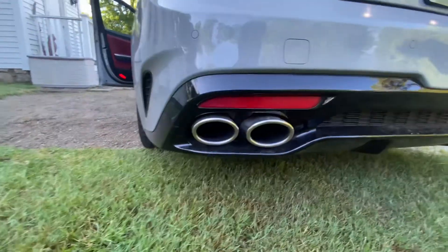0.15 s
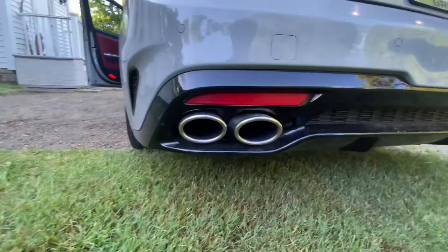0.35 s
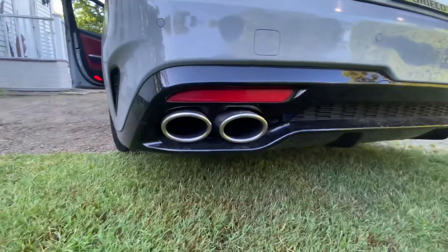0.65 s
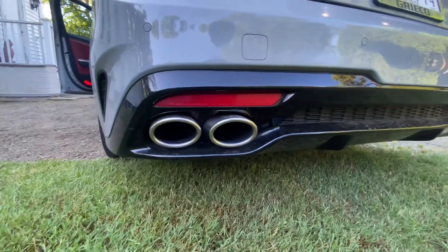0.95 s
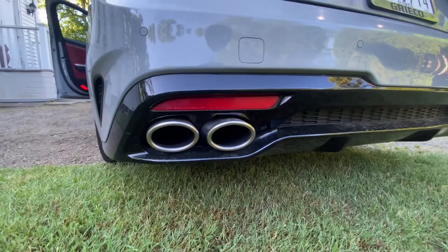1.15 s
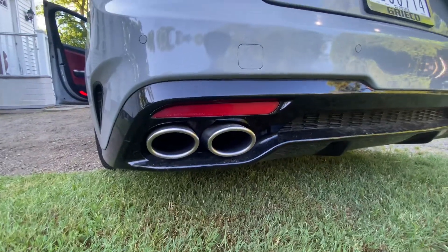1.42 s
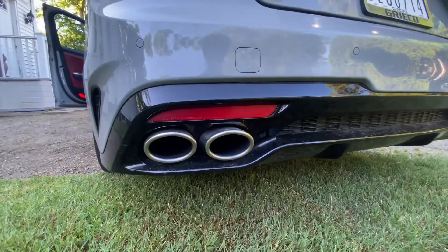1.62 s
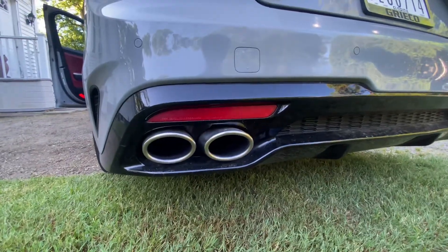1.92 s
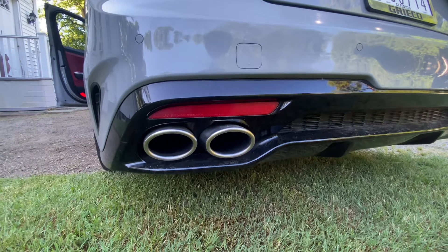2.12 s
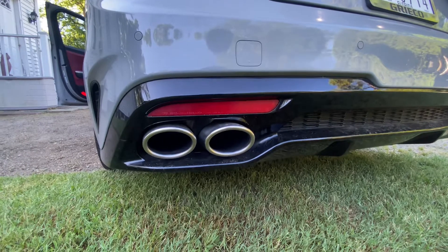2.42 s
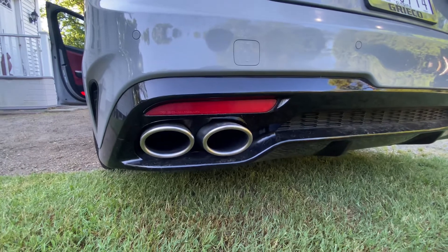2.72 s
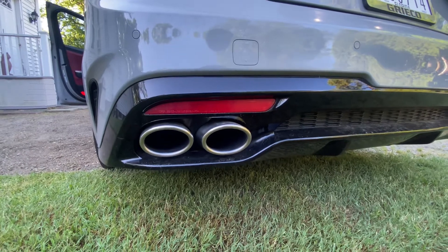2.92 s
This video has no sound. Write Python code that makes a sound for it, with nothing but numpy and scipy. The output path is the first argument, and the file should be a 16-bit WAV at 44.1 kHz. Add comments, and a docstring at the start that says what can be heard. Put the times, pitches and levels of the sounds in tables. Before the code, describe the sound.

Deep burbling exhaust idle heard close behind a parked car, with distant birdsong and tiny ticks

```python
"""A six-cylinder car idles, heard close behind its twin tailpipes, for about three seconds.
Throughout, harmonics make a deep hum, uneven puffs ring the pipe, and shaped noise makes gas rush and hiss.
The hiss eases in the first half second, while gliding tones make other birds' thin chirps.
One firing pushes harder after a second; a faint noise tick follows, then a far bird repeats three gliding notes.
Two more ticks, more chirps and another hard firing come in among its phrases."""
import sys
import numpy as np
from scipy import signal
from scipy.fft import rfft, irfft, next_fast_len
from scipy.io import wavfile
from scipy.ndimage import map_coordinates

SR = 44100
rng = np.random.default_rng(int(sys.argv[2]) if len(sys.argv) > 2 else 0)


def bounce(signal):
    """Save signal as a 16-bit WAV file at the path given by the first command-line argument."""
    frames = np.transpose(np.atleast_2d(signal))
    limited = np.clip(frames, -1, 1)
    pcm = np.round(limited * 32767).astype(np.int16)
    wavfile.write(sys.argv[1], SR, pcm)


N = 134946

# In every table and setting, a positive left-right value means the left is louder.
# engine speed: (time [s], firing rate [Hz])
ENGINE_SPEED = [(0.0, 68.88), (0.2, 69.48), (0.4, 70.42), (0.53, 69.67), (0.87, 70.25), (1.08, 69.03),
                (1.16, 68.42), (1.25, 68.91), (1.37, 69.66), (1.47, 68.56), (1.57, 69.95), (1.68, 68.27),
                (1.8, 69.34), (2.2, 69.69), (2.6, 69.12), (2.93, 68.94), (3.06, 68.99)]
CYLINDER_COUNT = 6
FIRST_FIRING = 0.027  # place in the cycle at the start [firings]

# harmonics of the hum: (multiple of one bank's firing rate, relative level [dB])
HUM_HARMONICS = [(1, -31), (2, 0), (3, -15), (4, -6.6), (5, -18), (6, -26), (7, -25.5), (8, -25.5),
                 (9, -25.5), (10, -24.5), (15, -38), (18, -39), (20, -39), (22, -39), (24, -42)]
# left-right balance of the hum: (frequency [Hz], left-right [dB])
HUM_BALANCE = [(69, .5), (104, .7), (139, -2.1), (174, -5), (208, 6.6), (347, 5.8), (560, 8.5)]
HUM_DB, HUM_LAG_S = -13, 0.00024
BANK_LEAD = 0.1  # lead of the odd harmonics [firings]
DISPERSION_S_PER_HZ = .000003  # the silencer delays high harmonics
SILENCER_HZ, SILENCER_WIDTH_HZ = 260, 14
WAVER_SHARE = .035  # dB of waver for each dB of a harmonic's relative level

# harder firings: (time [s], peak level [dB])
HARD_FIRINGS = [(1.143, -22), (2.791, -20)]
THUMP_S = 0.0019  # time from the peak to 1/e of it

# cylinders: (place in the cycle [firings], relative puff level [dB], relative ring level [dB])
CYLINDER_FIRINGS = [(.36, 0, -9), (1.15, 1, -5), (2.33, 0, -10), (3.05, -.5, -3.5), (4.33, -2, -8),
                    (5.15, -2.5, 2)]
# tone colour of a puff: (frequency [Hz], relative level [dB])
PUFF_COLOUR = [(250, -41), (390, -15), (438, 2), (468, -3.5), (505, 9.5), (535, 4), (570, 8), (640, 5.5),
               (690, 2.5), (730, -9), (790, -15), (850, -6), (950, -12), (1100, -11.5), (1350, -27),
               (1600, -34), (2100, -41), (3000, -57.5), (6000, -79)]
PUFF_DB, PUFF_PAN_DB, PUFF_LAG_S = -36, 8, 0.0005
PUFF_SCATTER_DB, PUFF_JITTER_S = 1.2, .00007
# pipe resonances: (frequency [Hz], width of one filter pass [Hz], relative level [dB])
PIPE_RESONANCES = [(905, 20, -1), (914, 62, 2.5), (1255, 50, -11)]
# loudness of the pipe ring: (time [s], level [dB])
RING_LOUDNESS = [(0, -40), (.4, -37.5), (.95, -38), (1.5, -39.5), (3.06, -39.5)]
RING_PAN_DB, RING_LAG_S = 5.5, .00003
RING_SCATTER_DB, RING_JITTER_S = 1.6, .00005

# colour of the low exhaust noise: (frequency [Hz], relative level per Hz [dB])
RUMBLE_COLOUR = [(20, -19), (55, -2), (90, -1), (150, -9), (200, -13), (320, -10.5), (450, -27),
                 (1000, -89.5)]
# colour of the gas rush: (frequency [Hz], relative level per Hz [dB])
GAS_COLOUR = [(120, -23.5), (220, -11.5), (320, -2.5), (400, -4), (600, 1), (780, -9.5), (945, -4),
              (1040, -4), (1270, -8), (1450, -17.5), (2200, -21), (4000, -53)]
# left-right balance of the gas rush: (frequency [Hz], left-right [dB])
GAS_BALANCE = [(200, 5), (400, -4), (550, 6.5), (780, 9), (950, 1.5), (1500, 2.5)]
RUMBLE_DB, GAS_DB, GAS_LAG_S = -32.5, -39.5, 0.00037

# colour of the engine hiss: (frequency [Hz], relative level per Hz [dB])
HISS_COLOUR = [(400, -7.5), (1500, -14.5), (2000, 1.5), (2500, -4), (3500, -7.5), (5000, -10.5),
               (7000, -14), (8600, -20), (10500, -21.5), (11900, -16.5), (12500, -43), (15000, -43.5)]
# middle loudness of the hiss, which swells around it: (time [s], level [dB])
HISS_LOUDNESS = [(0, -53.5), (.45, -58.5), (.9, -58), (3.06, -57)]
# colour of the valve tap: (frequency [Hz], relative level per Hz [dB])
TAP_COLOUR = [(1000, -36.5), (1650, -16), (1890, -4), (2100, -14.5), (2400, -19.5), (4000, -36),
              (6000, -74)]
TAP_DB = -64.5
# narrow singing bands: (frequency [Hz], width [Hz], level at the start [dB], left-right [dB])
WHINE_BANDS = [(1464, 23, -58.5, -7.5), (1860, 90, -62.5, -2), (2570, 66, -65.5, 3), (3785, 81, -67, 2),
               (4250, 90, -72.5, 1), (4970, 120, -72.5, 1), (12050, 180, -79.5, -0.5)]
WHINE_DB_PER_S = -2.8

# far bird's phrases: (time [s], middle note [dB], first note relative [dB], last note relative [dB])
BIRD_PHRASES = [(1.657, -60, -10, -5), (1.995, -53.5, -16, -7), (2.33, -51, -13, -4),
                (2.665, -51.5, -10, -6.5), (3.0, -55.5, -6, -6)]
# notes of a phrase: (centre after phrase time [s], length [s], start [Hz], end [Hz], blur [radians])
BIRD_NOTES = [(-.079, .035, 4280, 4130, .6), (0, .055, 3000, 2670, .35), (.095, .075, 2920, 3600, 1.3)]
# other birds: (centre [s], length [s], start [Hz], end [Hz], level [dB])
BIRD_CHIRPS = [(.09, .06, 3800, 3720, -62), (.35, .22, 4100, 4350, -68), (.44, .1, 4880, 4950, -69),
               (2.378, .1, 7800, 8650, -64), (2.436, .05, 8650, 7350, -66), (2.968, .06, 2700, 2540, -58)]
BIRD_PAN_DB, BIRD_ECHO_DB, BIRD_T60_S = -1.2, -1, 0.6

# faint clicks: (time [s], level before TICK_DB is added [dB], left-right [dB])
TICK_TIMES = [(1.5334, -61, 6), (2.259, -47.5, -18), (2.2882, -44, -5.5)]
# colour of a click: (frequency [Hz], relative level per Hz [dB])
TICK_COLOUR = [(2000, -34), (5000, -6), (8500, 1), (11000, -10.5), (14000, -21)]
TICK_T60_S, TICK_DB = 0.037, -12  # time to fall 60 dB [s], level trim [dB]

TOP_HZ = 15200


def amp(db):
    """Turn decibels into a gain."""
    return 10 ** (np.asarray(db) / 20)


def unit(x):
    """Scale a sound to rms 1."""
    return x / np.sqrt(np.mean(x ** 2) + 1e-20)


def along(points, hz):
    """Read (frequency [Hz], value) points on a log frequency axis."""
    f, v = np.transpose(points)
    return np.interp(np.log(hz + 1), np.log(f + 1), v)


def curve(rows):
    """Turn (time [s], value) points into one value per sample."""
    return np.interp(np.arange(N) / SR, *np.transpose(rows))


def wobble(rate):
    """Draw a smooth random curve with this many knots a second."""
    knots = rng.standard_normal(int(N * rate / SR) + 4)
    return map_coordinates(knots, [np.arange(N) * rate / SR])


def filtered(x, response):
    """Multiply the spectrum of x by a complex response of frequency."""
    m = next_fast_len(N + SR // 2)
    return irfft(rfft(x, m) * response(np.fft.rfftfreq(m, 1 / SR)), m)[..., :N]


def causal(gain):
    """Give the response with this gain that rings only after it is struck."""
    c = irfft(np.log(gain))
    # fold the half before the strike onto the half after it
    c[1:len(c) // 2] *= 2
    c[len(c) // 2 + 1:] = 0
    return np.exp(rfft(c))


def sides(pan_db):
    """Give left and right gains that differ by pan_db."""
    return amp(np.array([[.5], [-.5]]) * pan_db)


def placed(x, pan_db, lag_s):
    """Set a sound between left and right, with the left side arriving later."""
    lag = np.round(abs(lag_s) * SR) / SR
    lags = np.array([[lag], [0]])
    return sides(pan_db) * filtered(x, lambda hz: np.exp(-2j * np.pi * hz * lags))


def noise(colour, alike):
    """Make coloured stereo noise of rms 1; alike says how closely the two sides match."""
    a, b = filtered(rng.standard_normal((2, N)), lambda hz: amp(along(colour, hz)))
    u = np.arccos(np.clip(alike, -1, 1)) / 2
    shared, opposed = np.cos(u) * a, np.sin(u) * b
    return unit(np.array([shared + opposed, shared - opposed]))


def pulses(firings, places, levels_db, scatter_db, jitter_s):
    """Give one impulse per cylinder and cycle, each a little different in size and time."""
    cycles = np.arange(int(firings[-1] / CYLINDER_COUNT) + 1)[:, None]
    due = (cycles * CYLINDER_COUNT + places).ravel()
    at = np.interp(due, firings, np.arange(N), right=2 * N)  # late ones fall past the end
    chance = rng.standard_normal((len(at), 2))
    size = amp(np.tile(levels_db, len(cycles)) + scatter_db * chance[:, 0])
    samples = np.abs(at + jitter_s * SR * chance[:, 1]).astype(int)
    return np.bincount(samples, size, N)[:N]


def hum(firings):
    """Sum harmonics of the exhaust pressure wave; odd ones come from unequal banks, weak ones waver most."""
    out = np.zeros((2, N))
    for k, db in HUM_HARMONICS:
        hz = k * np.mean(curve(ENGINE_SPEED)) / 2
        turns = k * (firings + k % 2 * BANK_LEAD)
        delay = DISPERSION_S_PER_HZ * hz ** 2
        side_lag = np.array([[-1], [1]]) * hz * HUM_LAG_S
        phase = np.pi * (turns - delay + side_lag)
        # the silencer's narrow resonance turns the phase of harmonics near it
        silencer_turn = 2 * np.arctan2(SILENCER_WIDTH_HZ / 2, SILENCER_HZ - hz)
        waver_db = 0.033 * wobble(22) + WAVER_SHARE * db * wobble(8.6)
        level = np.sqrt(2) * amp(HUM_DB + db + waver_db)
        out += level * sides(along(HUM_BALANCE, hz)) * np.sin(phase - silencer_turn)
    return out


def tailpipe(firings):
    """Each firing gives a hollow puff and rings the pipe, unevenly from cylinder to cylinder."""
    places, puff_db, ring_db = np.transpose(CYLINDER_FIRINGS)

    def pipe(f):
        """Add up the pipe's resonances, each passed twice."""
        return sum(amp(db) * (1j * f * w / (hz * hz - f * f + 1j * f * w)) ** 2
                   for hz, w, db in PIPE_RESONANCES)

    puff_hits = pulses(firings, places, puff_db, PUFF_SCATTER_DB, PUFF_JITTER_S)
    puffs = filtered(puff_hits, lambda hz: causal(amp(along(PUFF_COLOUR, hz))))
    ring_hits = pulses(firings, places, ring_db, RING_SCATTER_DB, RING_JITTER_S)
    rings = filtered(ring_hits, pipe)
    puff_sound = amp(PUFF_DB) * placed(unit(puffs), PUFF_PAN_DB, PUFF_LAG_S)
    return puff_sound + amp(curve(RING_LOUDNESS)) * placed(unit(rings), RING_PAN_DB, RING_LAG_S)


def thumps():
    """Some firings push harder than the rest: each is one short, smooth negative pulse."""
    t = np.arange(N) / SR
    return -sum(amp(db) * np.exp(-((t - s) / THUMP_S) ** 2) for s, db in HARD_FIRINGS)


def gas(firings):
    """Turbulent exhaust makes a low rumble and a rush that swells with each firing."""
    swell = amp(0.57 * np.cos(2 * np.pi * (firings - .44)))
    rush = filtered(noise(GAS_COLOUR, alike=0.28), lambda hz: sides(along(GAS_BALANCE, hz)))
    rumble = amp(RUMBLE_DB) * noise(RUMBLE_COLOUR, alike=0.99)
    return rumble + amp(GAS_DB) * placed(unit(rush * swell), 0, GAS_LAG_S)


def hiss(firings):
    """Engine hiss swells slightly with each firing, with one soft, fading valve tap a cycle."""
    level_db = curve(HISS_LOUDNESS) + 1.0 * np.cos(2 * np.pi * (firings - .32))
    since_tap = (firings - 1.76) % CYLINDER_COUNT  # [firings]
    tap = np.exp(-since_tap / 0.34) * noise(TAP_COLOUR, alike=1.0)
    return amp(level_db) * noise(HISS_COLOUR, alike=0.38) + amp(TAP_DB) * unit(tap)


def whines():
    """Faint narrow bands of noise sing in the engine hiss and slowly fade."""
    def band(hz, width):
        """Keep only the noise near one frequency."""
        raw = rng.standard_normal((2, N))
        return unit(filtered(raw, lambda f: 1 / (1 + (2 * (f - hz) / width) ** 2)))

    fade = amp(WHINE_DB_PER_S * np.arange(N) / SR)
    return fade * sum(amp(db) * sides(pan) * band(hz, width) for hz, width, db, pan in WHINE_BANDS)


def whistle(centre, length, start_hz, end_hz, db, blur):
    """Make one gliding note that swells and fades, its phase blurred by distance."""
    u = np.clip((np.arange(N) / SR - centre) / length + .5, 0, 1)  # 0 to 1 through the note
    pitch_hz = start_hz + (end_hz - start_hz) * u
    phase = 2 * np.pi * np.cumsum(pitch_hz) / SR + blur * wobble(220)
    return np.sqrt(2) * amp(db) * np.sin(np.pi * u) ** 2 * np.sin(phase)


def birds():
    """Trees scatter a repeated phrase into a fading echo, its notes stressed anew; thin chirps stay dry."""
    song = sum(whistle(s + at, length, a, b, db + rel, blur)
               for s, db, first_db, last_db in BIRD_PHRASES
               for (at, length, a, b, blur), rel in zip(BIRD_NOTES, (first_db, 0, last_db)))
    chirps = sum(whistle(*row, blur=.45) for row in BIRD_CHIRPS)
    t = np.arange(SR // 2) / SR
    tail = rng.standard_normal((2, len(t))) * amp(-60 * t / BIRD_T60_S)
    echo = signal.fftconvolve(song[None], tail / np.linalg.norm(tail[0]), axes=1)[:, :N]
    return sides(BIRD_PAN_DB) * (song + chirps) + amp(BIRD_ECHO_DB) * echo


def ticks():
    """Tiny dry clicks: noise that starts at once and dies away quickly."""
    t = np.arange(N) / SR
    level = sum((t >= s) * amp(db + TICK_DB - 60 * np.abs(t - s) / TICK_T60_S) * sides(pan)
                for s, db, pan in TICK_TIMES)
    return level * noise(TICK_COLOUR, alike=.5)


def scene():
    """Count firings from the engine speed, which times most engine layers, and add all the layers."""
    firings = FIRST_FIRING + np.cumsum(curve(ENGINE_SPEED)) / SR
    exhaust = hum(firings) + tailpipe(firings) + thumps() + gas(firings)
    engine = hiss(firings) + whines()
    return exhaust + engine + birds() + ticks()


def record(dry):
    """Fade in over the first 100 samples and cut steeply above the top frequency."""
    low_pass = signal.ellip(10, .1, 80, TOP_HZ, fs=SR, output="sos")  # ripple .1 dB, cut 80 dB
    fade_in = np.minimum(np.arange(N) / 100, 1)
    return signal.sosfilt(low_pass, dry * fade_in)


dry = scene()
out = record(dry)
bounce(out)
```